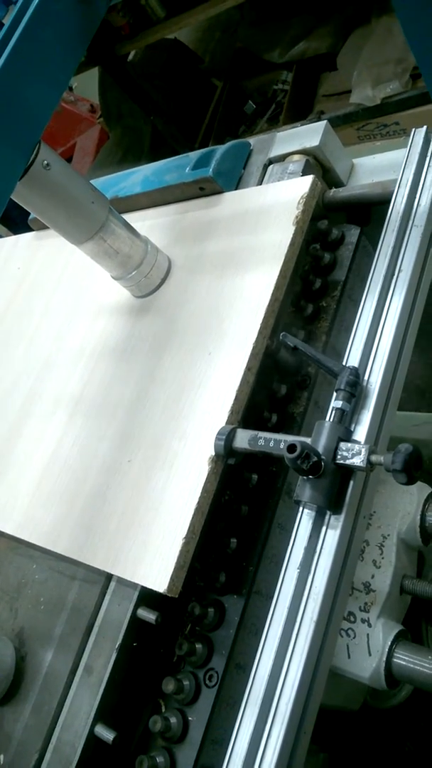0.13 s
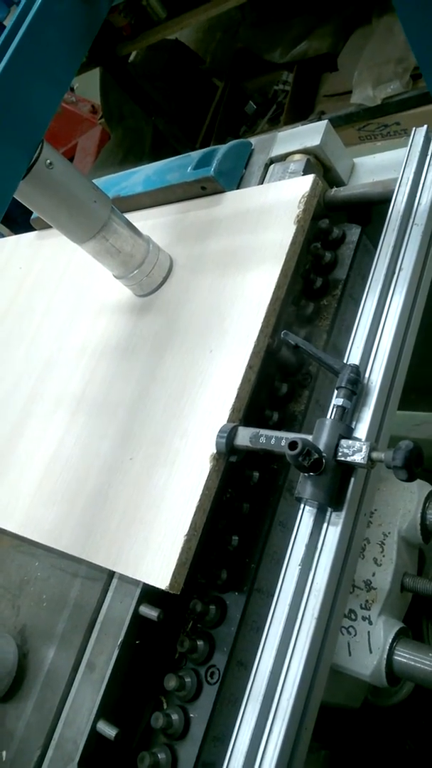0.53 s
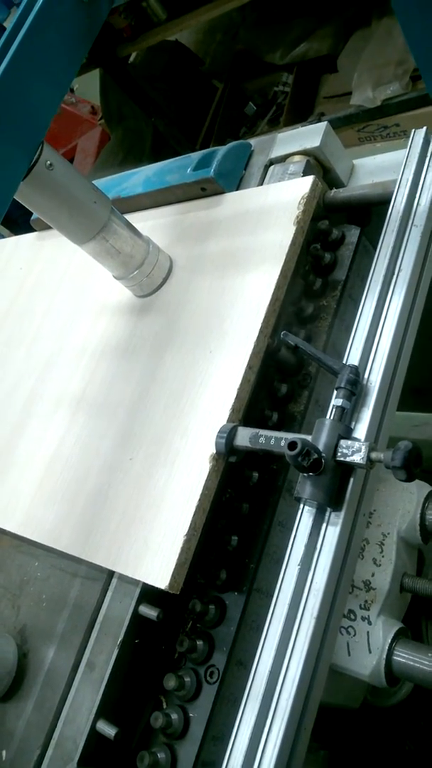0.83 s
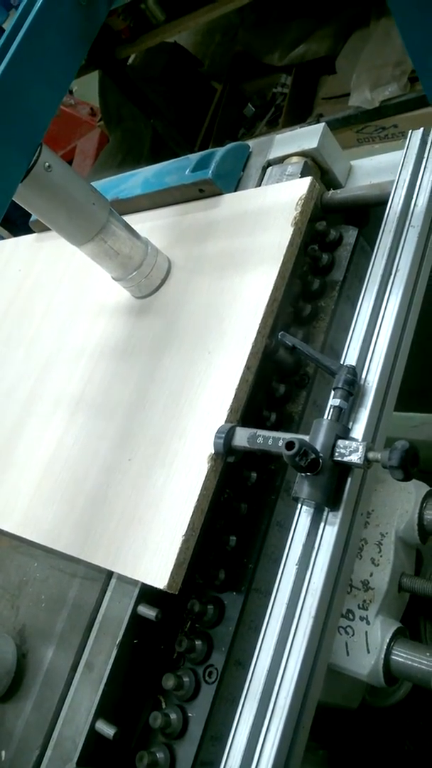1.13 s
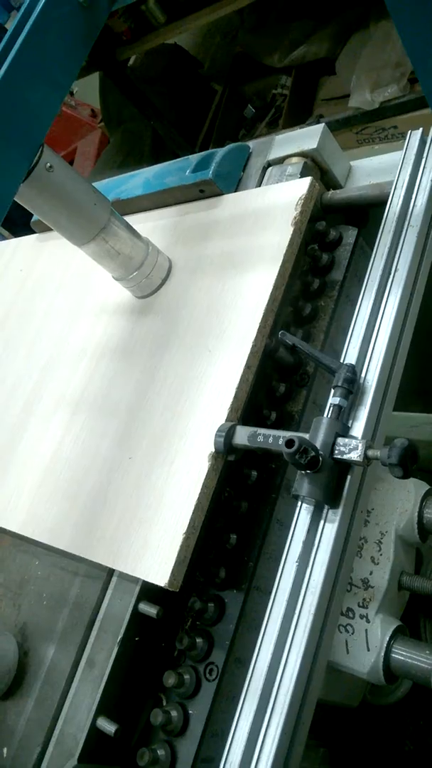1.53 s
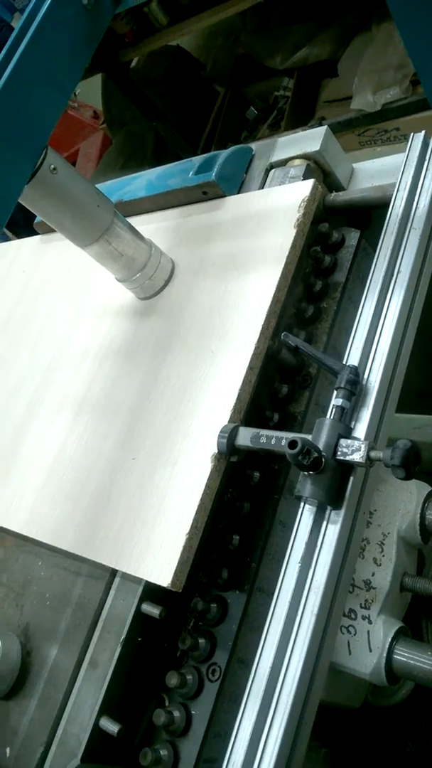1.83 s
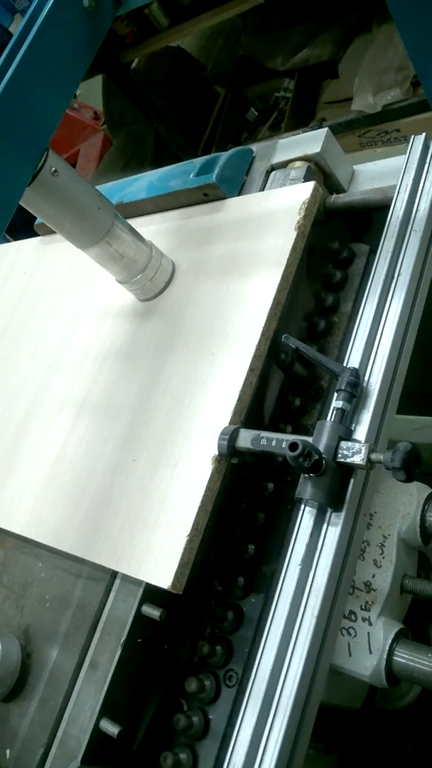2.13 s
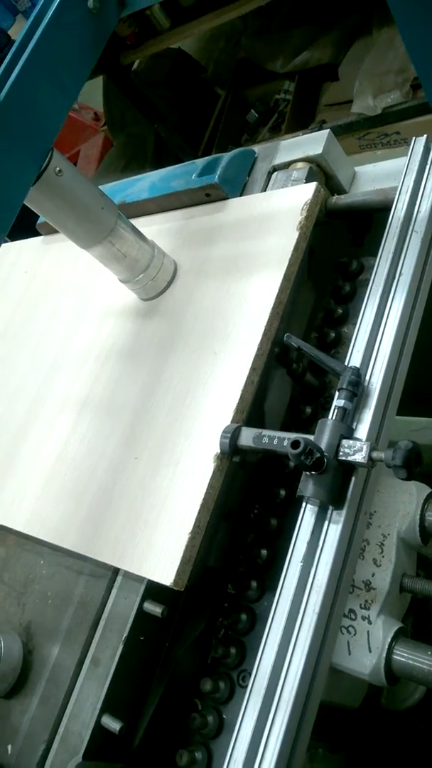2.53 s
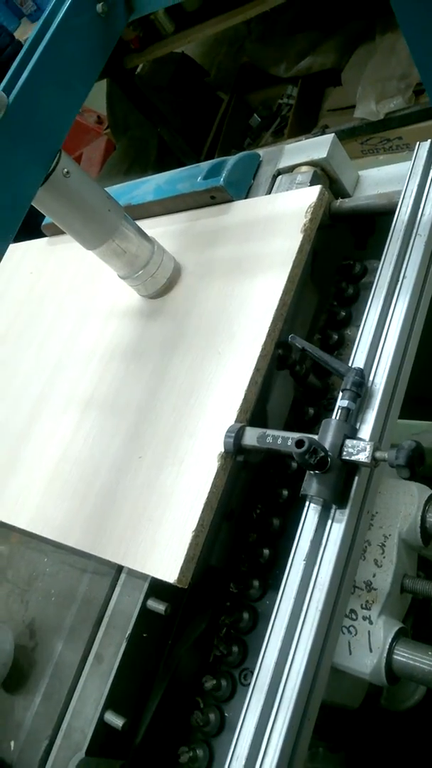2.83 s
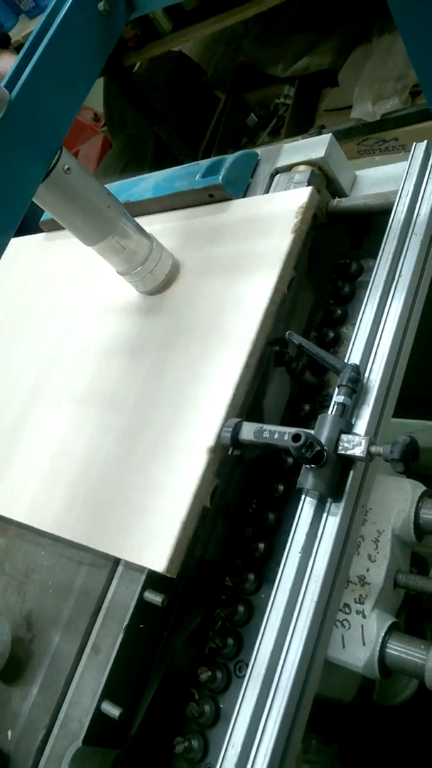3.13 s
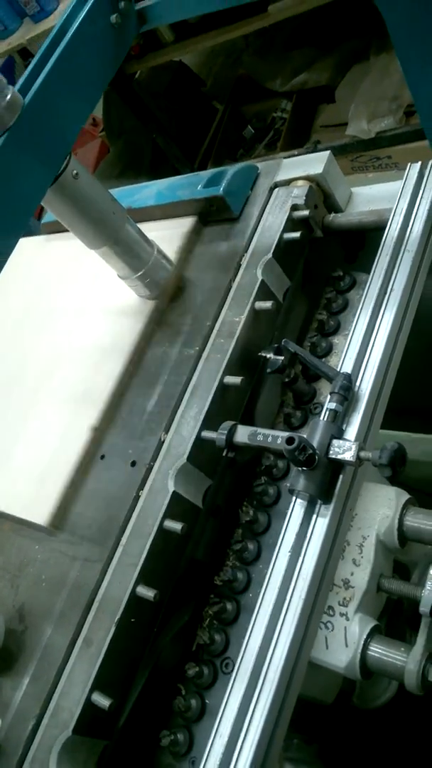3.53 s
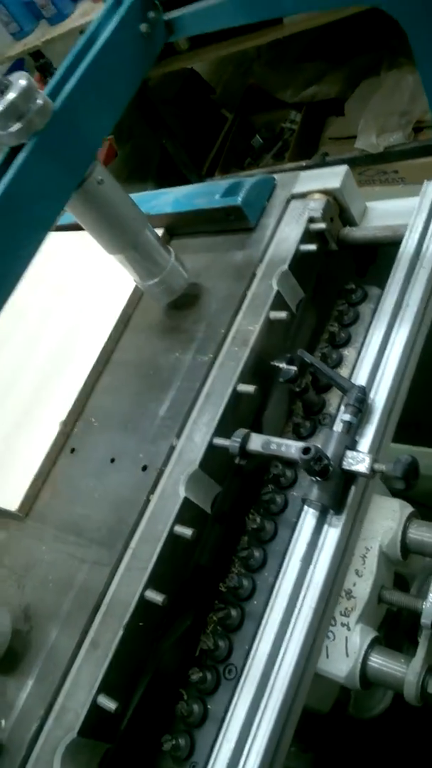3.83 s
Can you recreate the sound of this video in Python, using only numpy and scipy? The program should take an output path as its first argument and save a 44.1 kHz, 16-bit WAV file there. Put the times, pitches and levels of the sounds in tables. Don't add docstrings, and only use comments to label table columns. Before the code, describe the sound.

Close up in a workshop, loud boring-machine gears whine and rattle, then power down with a thump, air exhaust and loose rattling; afterwards a wooden board slides and knocks softly, ending with a faint valve puff.

```python
import sys
import numpy as np
from scipy import signal
from scipy.fft import rfft, irfft
from scipy.io import wavfile
from scipy.ndimage import uniform_filter1d

SR = 44100
rng = np.random.default_rng(int(sys.argv[2]) if len(sys.argv) > 2 else 0)


def transcribe(signal):
    frames = np.atleast_2d(signal).T
    limited = np.clip(frames, -1, 1)
    pcm = np.round(limited * 32767).astype(np.int16)
    wavfile.write(sys.argv[1], SR, pcm)


def gain_from_db(level_db):
    decades = np.asarray(level_db, float) / 20
    return 10 ** decades


N = 176400
T = np.arange(N) / SR
SHAFT_HZ = 49.47
BOTTOMED_S, POWER_OFF_S = 1.156, 1.845


def curve(table, axis=1):
    table = np.array(table)
    return np.interp(T, table[:, 0], table[:, axis])


def unit(x):
    return x / np.sqrt(np.mean(x ** 2))


def noise():
    return rng.standard_normal(N)


def colour(x, points, peaks=()):
    size = N + N // 10
    hz = np.maximum(np.arange(size // 2 + 1) * SR / size, 1)
    points = np.array(points)
    db = np.interp(np.log(hz), np.log(points[:, 0]), points[:, 1])
    for centre, width, height in peaks:
        db = db + height / (1 + (2 * (hz - centre) / width) ** 2)
    return irfft(rfft(x, size) * gain_from_db(db), size)[:N]


def walk(rate):
    hold = int(SR / rate)
    steps = np.repeat(rng.standard_normal(N // hold + 1), hold)
    smooth = uniform_filter1d(uniform_filter1d(steps, hold), hold)
    return unit(smooth[:N])


def step(at_s, blur_s):
    return .5 + .5 * np.tanh((T - at_s) / blur_s)


def ring(x, hz, width_hz):
    return signal.lfilter(*signal.iirpeak(hz, hz / width_hz, fs=SR), x)


def rings(table):
    rise_s = 0.009
    out, age = np.zeros(N + SR), T[:SR // 2]
    for start_s, hz, db, t60_s in table:
        at = int((start_s - rise_s) * SR)
        fade = gain_from_db(db - 60 * np.maximum(age - rise_s, 0) / t60_s)
        swell = 1 - np.exp(-(age / rise_s) ** 2)
        out[at:at + len(age)] += fade * swell * np.sin(2 * np.pi * hz * age)
    return out[:N]


def whine():
    thirds = [3, 6, 12, 18, 24, 30, 33, 36, 39, 42, 45, 48, 54, 57, 58, 60, 63, 66, 69, 72, 75, 78, 81, 84,
              87, 90, 91, 93, 94, 96, 111, 114, 117, 120, 126, 129, 132, 135, 138, 144, 150, 153, 156, 159,
              171, 177]
    # level in dB on entering the wood, boring, and bottomed.
    loads = [(-28, -29, -31), (-45, -45, -47), (-40, -43, -48), (-45, -47, -49), (-38, -37, -42),
             (-58, -50, -49), (-43, -48, -52), (-51, -42, -59), (-51, -46, -51), (-38, -41, -36),
             (-42, -45, -42), (-42, -45, -54), (-36, -37, -47), (-34, -36, -36), (-57, -41, -31),
             (-31, -41, -37), (-43, -35, -34), (-38, -36, -41), (-42, -43, -47), (-36, -43, -51),
             (-36, -35, -45), (-47, -44, -49), (-35, -38, -49), (-38, -41, -41), (-40, -40, -42),
             (-29, -28, -41), (-50, -40, -29), (-34, -41, -47), (-52, -45, -35), (-37, -40, -49),
             (-48, -45, -48), (-46, -42, -49), (-39, -41, -42), (-39, -37, -52), (-39, -41, -40),
             (-31, -43, -54), (-30, -33, -42), (-39, -45, -45), (-38, -44, -53), (-34, -43, -50),
             (-35, -40, -49), (-37, -40, -40), (-32, -40, -45), (-40, -38, -42), (-42, -40, -43),
             (-39, -44, -49)]
    # frequency in thirds of the shaft rate, level in dB.
    bottom_tones = [(127, -40), (131, -41), (142, -39), (158, -38), (176, -39), (218, -40)]
    tones = list(zip(thirds, loads))[1:]
    tones += [(third, (-70, -60, db)) for third, db in bottom_tones]
    turns = np.cumsum(SHAFT_HZ * (1 + 0.00071 * (T - 1))) / SR
    boring = step(0.38, 0.1)
    feed_ends, bottoms = step(1.04, 0.016), step(BOTTOMED_S, 0.023)
    out = 0
    for third, (enter_db, bore_db, bottom_db) in tones:
        bottomed = feed_ends if third < 45 else bottoms
        gain = gain_from_db(enter_db) * (1 - boring) + gain_from_db(bore_db) * (boring - bottomed) + gain_from_db(bottom_db) * bottomed
        wander = gain_from_db(1.5 * walk(7))
        out = out + gain * wander * np.sin(2 * np.pi * (turns * third / 3 + rng.random()))
    return gain_from_db(3.6) * out * (1 - step(POWER_OFF_S - .01, .05))


def clatter(cycles, keep, size):
    keep = np.clip(keep, 0, .95)
    rows = rng.standard_normal((int(cycles[-1]) + 2, size))
    rows = signal.lfilter([np.sqrt(1 - keep ** 2)], [1, -keep], rows, axis=0)
    return rows.ravel()[(cycles * size).astype(int)]


def train():
    # time in seconds, level in dB.
    loudness = [(0, -18.5), (.45, -19.5), (1.78, -22), (1.97, -27.5), (2.3, -25), (2.53, -27), (2.7, -30),
                (2.77, -36.5), (2.82, -44), (2.89, -51.5), (3.0, -60.5)]
    # frequency in Hz, level in dB.
    run_colour = [(71, -20), (120, -18), (591, -11), (946, -13.5), (1310, -6), (1510, -3.5), (1640, -5),
                  (2630, -3), (15900, -27.5)]
    # frequency in Hz, level in dB.
    coast_colour = [(150, -29), (400, -9.5), (900, -7.5), (2000, 3), (4000, -7), (7000, -14), (10000, -25),
                    (15900, -23)]
    # frequency in Hz, width in Hz, height in dB.
    housing = [(752, 49, 9), (998, 180, 10), (3600, 44, 5.5), (2050, 250, 6), (2640, 250, 2.5),
               (3830, 1300, 4.5), (6160, 2000, 4), (11000, 2900, 2)]
    # start in seconds, peak in dB.
    backlash = [(2.457, -22), (2.503, -15.5), (2.547, -17), (2.588, -9), (2.652, -20), (2.683, -21),
                (2.735, -31), (2.795, -32)]
    turns = np.cumsum(np.full(N, SHAFT_HZ)) / SR
    late, off = step(BOTTOMED_S, 0.0068), step(POWER_OFF_S, 0.089)
    each_turn = clatter(turns, .3, size=891)
    third_turn = clatter(turns / 3, .4, size=2673)
    teeth = np.sqrt(1 - late) * each_turn + np.sqrt(late) * third_turn
    beat = 1 + 0.12 * np.cos(4 * np.pi * turns)
    run = unit(colour(teeth * beat * gain_from_db(0.314 * walk(15.6)), run_colour, housing))

    coasting_s = np.maximum(T - POWER_OFF_S, 0)
    slow_turns = np.cumsum(np.clip(SHAFT_HZ - 30 * coasting_s, 5, 99)) / SR
    loose = noise() * (1 + 0.1 * np.cos(2 * np.pi * slow_turns)) * gain_from_db(1.1 * walk(20))
    coast = unit(colour(loose, coast_colour, housing[4:6]))
    knocks = np.zeros(N)
    for start_s, db in backlash:
        knocks += gain_from_db(db - 20.5) * (T > start_s) * np.exp(-np.abs(T - start_s) / 0.016)
    body = gain_from_db(0.32) * np.sqrt(1 - off) * run + gain_from_db(-5.5) * np.sqrt(off) * coast
    return gain_from_db(curve(loudness)) * body + knocks * coast


def frame():
    # time in seconds, level in dB.
    hum_level = [(0, -27), (1.0, -29), (1.8, -32), (2.1, -32), (2.25, -32), (2.44, -29), (2.55, -43),
                 (2.6, -44), (2.635, -54), (2.67, -43), (3.0, -48.5), (3.2, -53), (4.0, -58)]
    sway_hz, sway_s, peak_s = 39.6, 2.42, 2.39
    sway = np.exp(-((T - peak_s) / np.where(T < peak_s, .24, .09)) ** 2)
    hum = gain_from_db(curve(hum_level)) * np.sin(2 * np.pi * SHAFT_HZ * (T - sway_s))
    return np.sqrt(2) * (hum + gain_from_db(-27.5) * sway * np.sin(2 * np.pi * sway_hz * (T - sway_s)))


def carriage():
    # time in seconds, level in dB, share of deep shudder from 0 to 1.
    rumble = [(1.78, -31, 0.5), (1.84, -22.5, 0.1), (1.92, -22.5, 0), (1.97, -30.5, 0.5),
              (2.26, -32.5, 0.96), (2.36, -25, 0.89), (2.44, -30, 0.99), (2.58, -44, 0.97), (2.9, -54, 0.2)]
    # frequency in Hz, level in dB.
    grind_colour = [(70, -16), (250, -3), (450, -1.5), (800, -4), (1400, -11), (2500, -25)]
    # frequency in Hz, level in dB.
    shudder_colour = [(40, -21), (90, -2.5), (170, -4.5), (400, -9.5), (650, -18.5), (2000, -69)]
    # start in seconds, frequency in Hz, peak in dB, t60 in seconds.
    frame_rings = [(1.83, 250, -18.5, 0.18), (1.84, 370, -17, 0.074), (1.95, 248, -23, 0.28),
                   (2.01, 510, -32, 0.46), (2.02, 965, -32, 0.19), (2.17, 245, -30.5, 0.27),
                   (2.56, 1200, -37.5, 0.54), (2.66, 355, -44, 0.43), (2.76, 355, -43, .6)]
    deep = np.clip(curve(rumble, axis=2), 0, 1)
    grind = unit(colour(noise() * gain_from_db(2.0 * walk(25.0)), grind_colour))
    shudder = unit(colour(noise() * gain_from_db(2.0 * walk(25.0)), shudder_colour))
    body = np.sqrt(1 - deep) * grind + np.sqrt(deep) * shudder
    moving = step(1.775, 0.013) * (1 - step(2.95, 0.028))
    return body * gain_from_db(curve(rumble)) * moving + rings(frame_rings)


def air():
    # time in seconds, level in dB.
    exhaust = [(1.79, -35), (1.815, -19.5), (1.86, -20.5), (1.93, -23.5), (2.1, -26.5), (2.4, -31.5),
               (2.6, -42.5), (2.9, -56), (2.98, -86)]
    # frequency in Hz, level in dB.
    jet_colour = [(300, -6.5), (2000, 4), (6000, -1.5), (9300, -10.5), (11500, -8.5), (14000, -13.5),
                  (16000, -10.5)]
    # frequency in Hz, level in dB.
    puff_colour = [(500, -3), (1500, 5.5), (5000, -10.5), (8500, -22), (11300, -16), (13000, -19),
                   (15500, -28)]
    jet = unit(colour(noise() * gain_from_db(1.0 * walk(25.6)), jet_colour))
    jet = jet * gain_from_db(curve(exhaust)) * (T > exhaust[0][0])
    puff_s, rise_s, hold_s, fall_s = 3.81, 0.013, 0.024, 0.066
    fade = np.exp(-np.maximum(T - puff_s - hold_s, 0) / fall_s) * (1 - 0.56 * step(3.905, .012))
    shape = step(puff_s, rise_s / 2) * fade
    return jet + gain_from_db(-44.5) * shape * unit(colour(noise(), puff_colour))


def panel(force, bright_hz, spread, slope):
    # frequency in Hz, width in Hz, level in dB.
    modes = [(291, 23, 1.5), (440, 97, 2), (618, 57, 2), (850, 82, -1), (980, 160, 2.5), (1240, 54, 1),
             (1460, 61, -2), (1740, 120, 1), (2280, 33, -5)]
    bands = [(hz, width * spread, db) for hz, width, db in modes]
    bands += [(hz, hz / 3, -1) for hz in 140 * 2 ** np.arange(0, 6, .4)]
    out = 0
    for hz, width, db in bands:
        tone = unit(ring(ring(force, hz, width), hz, 3 * width))
        dulling = np.sqrt((1 + (hz / bright_hz) ** slope) * (1 + (bright_hz / 3 / hz) ** 2))
        out = out + gain_from_db(db + 2.2 * walk(22)) * tone / dulling
    return out


def board():
    # time in seconds, level in dB, brightness in Hz.
    slide = [(3.1, -53, 203), (3.17, -47.5, 296), (3.33, -41.5, 423), (3.42, -46, 750), (3.58, -41, 1700),
             (3.7, -44, 1500), (3.8, -48, 724), (3.87, -57, 545), (3.94, -65, 600)]
    # time in seconds, level in dB.
    hiss_level = [(3.17, -97), (3.185, -78), (3.25, -88), (3.39, -71), (3.45, -70), (3.49, -64), (3.6, -66),
                  (3.65, -65), (3.75, -69), (3.79, -85)]
    # frequency in Hz, level in dB.
    hiss_colour = [(6000, -25), (9000, 1), (10500, 5), (12200, 1), (13200, 0), (14200, -15), (15700, -24)]
    # start in seconds, frequency in Hz, peak in dB, t60 in seconds.
    board_rings = [(3.155, 205, -42, .12), (3.175, 275, -39, 0.2), (3.262, 430, -34, 0.14),
                   (3.32, 520, -39, 0.12), (3.35, 430, -37, 0.2), (3.475, 290, -38, 0.22),
                   (3.558, 290, -41, 0.31), (3.587, 1240, -42, 0.089), (3.64, 1010, -27.5, 0.058),
                   (3.641, 1790, -33, 0.048), (3.641, 1486, -38, 0.088), (3.641, 2060, -35, 0.053),
                   (3.645, 608, -36, 0.17), (3.655, 1250, -46, 0.18), (3.7, 285, -45, .3),
                   (3.76, 290, -45, 0.57), (3.83, 275, -38.5, 0.27)]
    # time in seconds, level in dB, length in seconds, brightness in Hz.
    board_knocks = [(3.0, -50.5, 0.0035, 292), (3.072, -49, 0.0025, 298), (3.147, -54, 0.012, 1210),
                    (3.182, -54, 0.0086, 2500), (3.302, -41, 0.004, 1300), (3.384, -45, 0.005, 1790),
                    (3.528, -41, 0.004, 1100), (3.642, -34.5, 0.0046, 1300)]
    grit = noise() * gain_from_db(3.5 * rng.exponential(size=N) * 0.58 + 1.5 * walk(60))
    rub = panel(grit, np.clip(curve(slide, axis=2), 150, 4000), 2.6, 5.0)
    rub = rub / np.sqrt(uniform_filter1d(rub ** 2, size=8000))
    rub = rub * gain_from_db(curve(slide)) * step(3.09, 0.017)
    hiss = unit(colour(grit, hiss_colour)) * gain_from_db(curve(hiss_level) + 2.5 * walk(30))
    hiss = hiss * (T > hiss_level[0][0])

    blows, bright = np.zeros(N), np.zeros(N)
    for at_s, db, length_s, hz in board_knocks:
        blows += gain_from_db(db) * np.exp(-((T - at_s) / np.where(T < at_s, length_s, 2 * length_s)) ** 2)
        bright[T > at_s - .02] = hz
    thud = panel(noise(), np.clip(bright, 150, 4000), 1.0, 24)
    thud = thud / np.sqrt(uniform_filter1d(thud ** 2, size=600))
    return rub + hiss + rings(board_rings) + blows * thud


def echo(near):
    age = T[:SR // 2]
    tail = rng.standard_normal(SR // 2) * np.exp(-np.log(1000) * age / .3)
    return gain_from_db(-8) * signal.fftconvolve(near, tail / np.sqrt(np.sum(tail ** 2)))[:N]


def room_floor():
    # frequency in Hz, level in dB.
    floor_colour = [(25, -15), (38, -23), (60, -13), (98, -18), (514, -28.5), (965, -30.5), (1860, -39),
                    (6110, -38), (15900, -66)]
    lull = 1 - 0.52 * np.exp(-((T - 3.1) / .07) ** 2)
    return gain_from_db(-61) * unit(colour(noise(), floor_colour)) * lull


def scene():
    near = air() + board()
    mono = whine() + train() + carriage() + frame() + near + echo(near) + room_floor()
    return np.array([mono, mono])


def band_limit(x):
    return signal.sosfilt(signal.butter(12, 16050, fs=SR, output="sos"), x)


def record(dry):
    # frequency in Hz, level in dB.
    mic_response = [(8000, 0), (9300, -4), (11500, 2), (15500, -1), (15780, -3), (15850, -60)]
    heard = colour(dry[0], mic_response)
    return band_limit(np.tile(heard, (len(dry), 1)))


dry = scene()
out = record(dry)
transcribe(out)
```